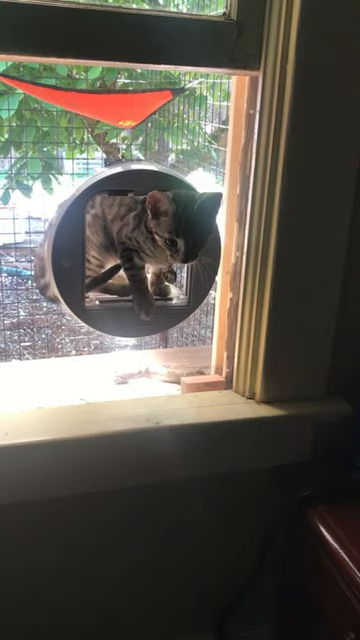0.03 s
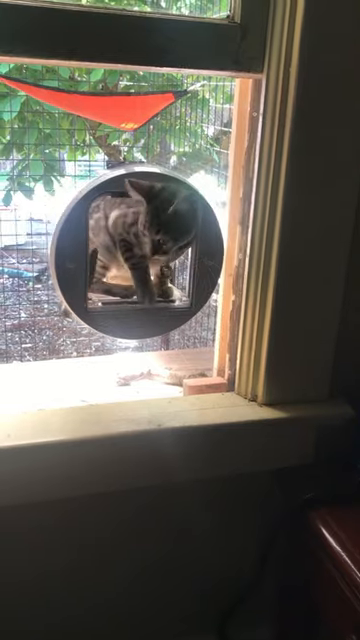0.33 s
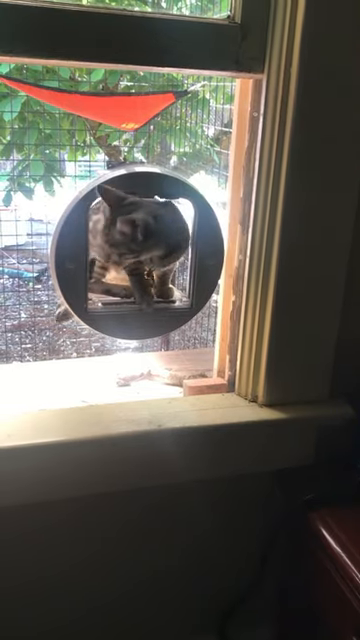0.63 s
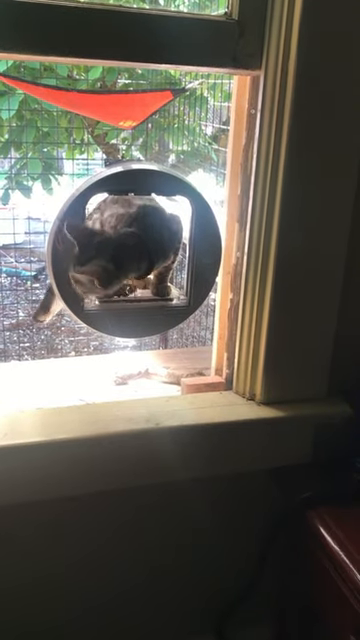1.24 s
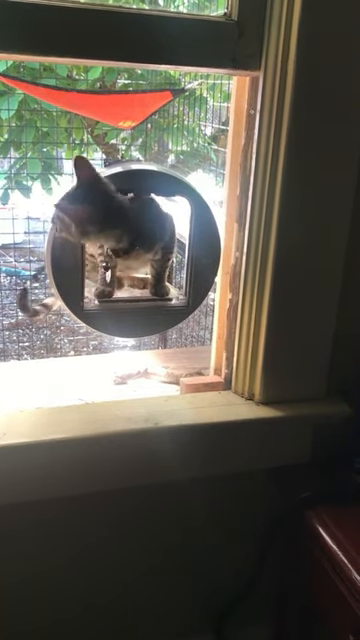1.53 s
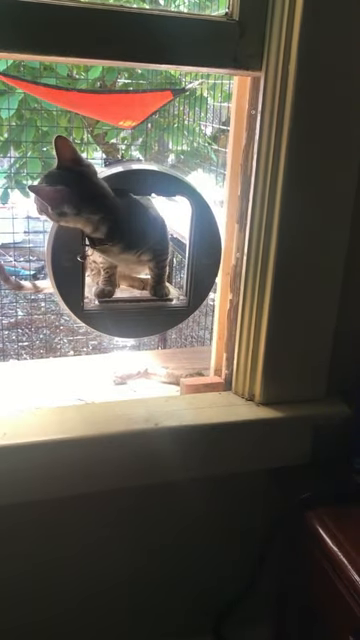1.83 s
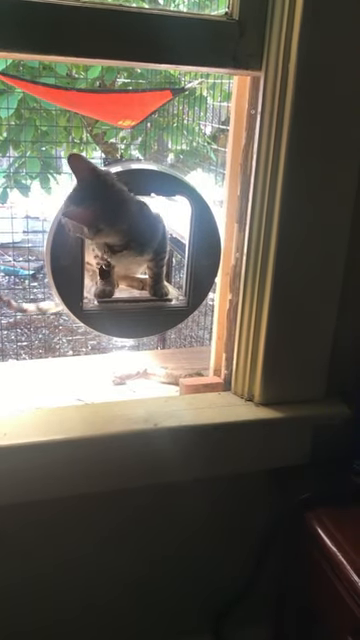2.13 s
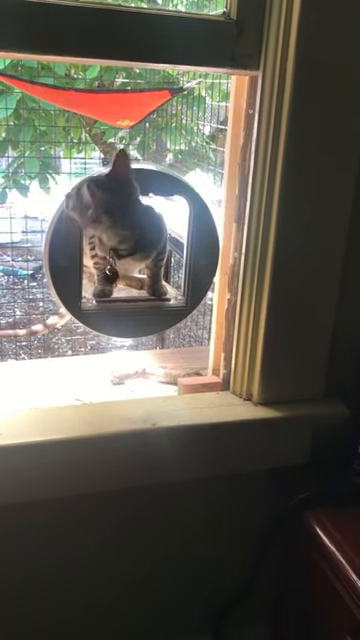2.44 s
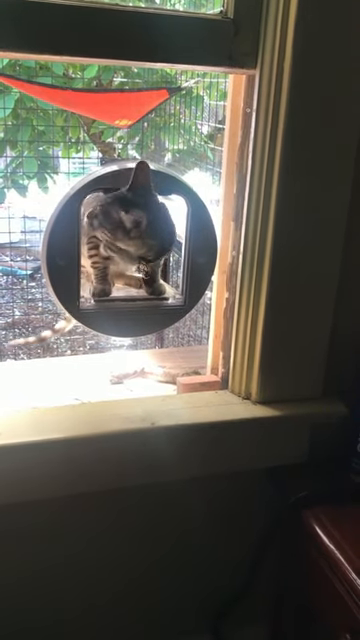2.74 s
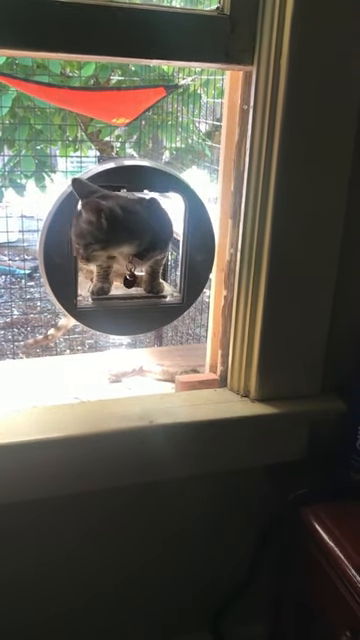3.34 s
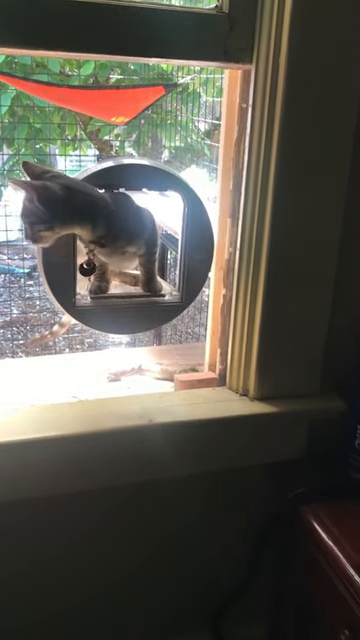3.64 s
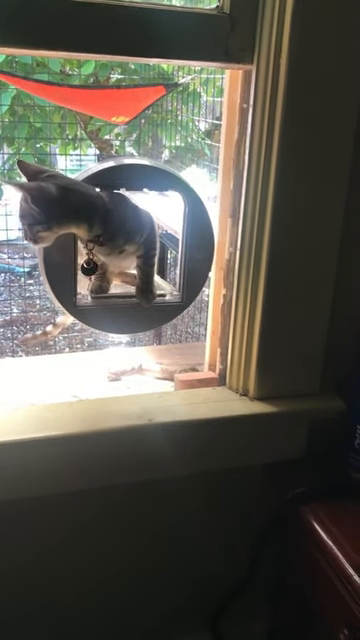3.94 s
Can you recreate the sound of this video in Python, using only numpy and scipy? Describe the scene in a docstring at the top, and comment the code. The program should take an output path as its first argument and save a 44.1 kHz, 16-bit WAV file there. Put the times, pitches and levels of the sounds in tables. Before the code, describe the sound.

In a quiet room with a low rumble, a collar bell jingles softly as a cat shifts in a cat door. The plastic flap ticks, the bell hits the frame with a sharp knock, and a few faint tinkles follow.

```python
"""A cat shifts about in a plastic cat door set in a window, heard from inside a quiet room.
Low rumble, mains hum and a faint, slowly growing wash from outdoors run throughout.
The flap ticks softly at 0.3 s. From 1 s the pellet rolls and strikes in the cat's collar bell.
At 1.8 s the flap ticks again, then the bell swings against the frame with a sharp knock.
The bell tinkles on until 2.2 s; two faint strikes follow, near 2.5 s and 3.9 s."""
import sys
import numpy as np
from scipy import signal
from scipy.fft import rfft, irfft
from scipy.io import wavfile
from scipy.ndimage import map_coordinates

SR = 44100
rng = np.random.default_rng(int(sys.argv[2]) if len(sys.argv) > 2 else 0)


def to_wav(sig):
    """Store sig (one row per channel, or 1-D mono) as 16-bit WAV at the path in sys.argv[1].

    Samples outside -1..1 are clipped; the rate is SR.
    """
    pcm = np.clip(np.atleast_2d(sig), -1, 1) * 32767
    pcm = np.round(pcm).astype(np.int16)
    wavfile.write(sys.argv[1], SR, pcm.T)  # frames by channels


N = 176400
SCENE_S = np.arange(N) / SR
EVENT_S = np.arange(SR // 2) / SR

# pellet click on the bell shell: freq_hz, level_db
CLICK_SPECTRUM = [(500, -34), (3600, -24), (4500, -3.5), (4950, -11), (5500, -3), (6400, 1.5), (7700, -15),
                  (9200, -8.5), (12500, -17), (15500, -13)]
CLICK_T60_S, RING_ATTACK_S, BELL_WET_DB = 0.029, 0.00044, -3


def amp(db):
    """Decibels to gain."""
    return 10 ** (np.asarray(db) / 20)


def along(points, hz):
    """Interpolate (freq_hz, value) points on a log frequency axis."""
    freqs_hz, values = np.transpose(points)
    return np.interp(np.log(hz + 1), np.log(freqs_hz + 1), values)


def noise(spectrum, size):
    """Coloured noise, rms 1."""
    gain = amp(along(spectrum, np.fft.rfftfreq(size, 1 / SR)))
    x = irfft(rfft(rng.standard_normal(size)) * gain, size)
    return x / np.sqrt(np.mean(x ** 2) + 1e-20)


def wobble(rate_hz):
    """Smooth random curve."""
    return map_coordinates(rng.standard_normal(1024), [SCENE_S * rate_hz], mode="mirror")


def rise(attack_s):
    """Exponential onset."""
    return 1 - np.exp(-EVENT_S / attack_s)


def fade(t60_s):
    """Exponential decay."""
    return 1000 ** (-EVENT_S / t60_s)


def mode(hz, db, t60_s):
    """Decaying sine, random phase."""
    return amp(db) * np.sin(2 * np.pi * (hz * EVENT_S + rng.random())) * fade(t60_s)


def burst(spectrum, t60_s):
    """Decaying noise: a dense cluster of short-lived resonances."""
    return noise(spectrum, len(EVENT_S)) * fade(t60_s) * rise(attack_s=0.00023)


def add(track, start_s, sound):
    """Mix a sound into the track."""
    part = track[round(start_s * SR):][:len(sound)]
    part += sound[:len(part)]


def in_room(x, wet_db=0, gap_s=0.014):
    """Add the quick reflections of the window recess and the room's tail."""
    # room decay: freq_hz, t60_s
    decay = [(300, 0.057), (1500, 0.23), (5000, 0.29), (12000, 0.09)]
    size = len(EVENT_S)
    hz, time_s, bands = signal.stft(rng.standard_normal(size), SR, nperseg=256)
    bands *= 1000 ** (-time_s / along(decay, hz)[:, None])
    tail = signal.istft(bands, SR, nperseg=256)[1][:size]
    recess = rng.standard_normal(size) * fade(t60_s=0.1)
    response = amp(-16.5) * tail / np.linalg.norm(tail) + amp(-13.5) * recess / np.linalg.norm(recess)
    wet = signal.fftconvolve(x, np.pad(response, (round(gap_s * SR), 0)))[:len(x)]
    return x + amp(wet_db) * wet


def room_tone(rumble_db=-53, waver_db=3.5, waver_rad=0.76):
    """Low rumble, thin hiss and a wavering mains hum."""
    # hum partials: freq_hz, level_db
    partials = [(53, -61), (120, -60), (240, -63)]
    # rumble and hiss spectrum: freq_hz, level_db
    rumble = [(20, -32), (35, -7), (50, -3), (58, 1.5), (72, -13), (100, -8), (145, -9.5), (185, -10),
              (280, -8), (400, -8.5), (500, -19.5), (720, -24.5), (1100, -29.5), (2000, -37.5),
              (4000, -41.5), (8000, -46.5), (15500, -48)]
    hum = np.zeros(N)
    for hz, db in partials:
        peak = np.sqrt(2) * amp(db + waver_db * wobble(5.96))
        hum += peak * np.sin(2 * np.pi * hz * SCENE_S + waver_rad * wobble(5.98))
    return hum + amp(rumble_db) * noise(rumble, N)


def outdoors(start_db=-78.5, growth_db_per_s=1.8):
    """A distant wash comes in through the open door."""
    # wash spectrum: freq_hz, level_db
    wash = [(300, -41), (600, -17.5), (1000, 2), (1500, -3), (2500, -8.5), (5000, -24.5), (10000, -41)]
    return amp(start_db + growth_db_per_s * SCENE_S) * noise(wash, N)


def flap(crack_db=-3.5):
    """The plastic flap ticks as the cat pushes by; a soft contact is duller."""
    # flap contacts: start_s, level_db, brightness_hz
    ticks = [(0.3164, -52.5, 3380), (1.814, -42.5, 8000)]
    # flap resonances: pitch_hz, level_db, t60_s
    modes = [(1093, -8, 0.038), (1374, -3.5, 0.032), (2230, -11, 0.041), (2590, -2.5, 0.024),
             (3070, -7, 0.035), (3460, -2, 0.026), (3880, 0, 0.028), (5060, -5, 0.018), (5480, 0, 0.016),
             (6170, -8, 0.019), (8870, -3, 0.02), (9600, -6, 0.012)]
    out = np.zeros(N)
    for start_s, level_db, bright_hz in ticks:
        ring = sum(mode(hz, db, t60_s) / np.hypot(1, (hz / bright_hz) ** 4) for hz, db, t60_s in modes)
        crack = amp(crack_db) * burst([(bright_hz / 2, 0), (bright_hz * 2, -18)], t60_s=0.029)
        tick = ring * rise(RING_ATTACK_S) + crack
        add(out, start_s, in_room(amp(level_db) * tick))
    return out


def pellet_roll(clicks_per_s=34, spread_db=3.5):
    """The loose pellet rattles faintly round the shell as the cat turns."""
    # pellet rolls: start_s, end_s, click_db
    rolls = [(1, 1.62, -72), (1.93, 2.18, -68)]
    out = np.zeros(N)
    for start_s, end_s, click_db in rolls:
        for click_s in rng.uniform(start_s, end_s, int((end_s - start_s) * clicks_per_s)):
            gain = amp(click_db - spread_db * rng.standard_normal())
            add(out, click_s, gain * burst(CLICK_SPECTRUM, CLICK_T60_S))
    return in_room(out, BELL_WET_DB)


def bell(scatter_hz=35, twin_offset_hz=89, twin_db=-6):
    """Each pellet strike clicks and rings the shell; the low mode beats with a weaker twin."""
    # pellet strikes: start_s, click_db, low_mode_db, middle_mode_db, top_mode_db
    strikes = [(1.027, -51.5, -53, -71, -46), (1.066, -65, -75, -78, -61), (1.0887, -65, -77, -80, -75),
               (1.1642, -56.5, -58.5, -64, -70), (1.174, -61, -76, -78, -74),
               (1.2282, -48.5, -54.5, -58, -48.5), (1.234, -55.5, -74, -66, -72),
               (1.285, -61.5, -65, -80, -78), (1.346, -60, -68, -71, -73), (1.4348, -65.5, -76, -84, -84),
               (1.5028, -62.5, -71, -72, -76), (1.5545, -72, -82, -84, -82), (1.8858, -50, -31, -55, -62),
               (1.9196, -66, -43, -62, -57), (1.9402, -55, -57, -52, -59), (1.9727, -49, -48.5, -64, -52),
               (2.01, -49.5, -56, -66, -57), (2.022, -52.5, -68, -68, -55.5),
               (2.077, -61, -55.5, -64, -57.5), (2.108, -63, -56.5, -68, -68),
               (2.1633, -69, -60.5, -70, -68), (2.171, -67, -64, -76, -76), (2.4652, -62, -59, -85, -81),
               (3.852, -63, -67, -83, -82)]
    # shell resonances, low to top: pitch_hz, t60_s
    modes = [(4520, 0.042), (10590, 0.065), (11120, 0.055)]
    out = np.zeros(N)
    for start_s, click_db, *modes_db in strikes:
        ring = np.zeros(len(EVENT_S))
        for k, ((hz, t60_s), db) in enumerate(zip(modes, modes_db)):
            hz = hz + rng.uniform(-scatter_hz, scatter_hz)
            wave = np.sin(2 * np.pi * hz * EVENT_S)
            if k == 0:
                wave += amp(twin_db) * np.sin(2 * np.pi * (hz + twin_offset_hz) * EVENT_S)
            ring += amp(db) * wave * fade(t60_s)
        click = amp(click_db) * burst(CLICK_SPECTRUM, CLICK_T60_S)
        add(out, start_s, in_room(ring * rise(RING_ATTACK_S) + click, BELL_WET_DB))
    return out


def frame_knock(crack_t60_s=0.019, thud_t60_s=0.044):
    """The bell hits the frame and rings it, rebounds twice and sings as it comes free."""
    # bell hits on the frame: start_s, level_db, thud_db, fizz_db
    hits = [(1.8858, -24.5, -40.5, -49), (1.898, -29.5, -39, -50), (1.9033, -27, -39.5, -43)]
    # frame resonances: pitch_hz, level_db, t60_s
    modes = [(542, -1.5, 0.076), (1135, 1.5, 0.077), (1283, -3, 0.11), (2194, 2, 0.067), (2530, 0, 0.1),
             (3060, -1, 0.069), (3490, 3, .045), (3840, 5, 0.048), (4500, 7, .035), (5090, 1, 0.038),
             (5200, 0, 0.038), (6360, 4, 0.069)]
    # sharp contact: freq_hz, level_db
    crack_spectrum = [(300, -27), (1700, -24), (2300, -7.5), (3300, -4), (4500, 0), (5350, 2.5), (5700, -8),
                      (6300, -2.5), (7800, -18), (8700, -11), (10000, -23), (16000, -34)]
    # low body of the hit: freq_hz, level_db
    thud_spectrum = [(150, -32), (480, -6), (760, -11.5), (1050, -1), (1300, -4), (1650, -10), (3000, -14)]
    # top treble of the hit: freq_hz, level_db
    fizz_spectrum = [(6000, -36), (11000, -12), (14500, 9), (16000, 4)]
    out = np.zeros(N)
    for start_s, level_db, thud_db, fizz_db in hits:
        frame = amp(-25) * sum(mode(hz, db, t60_s) for hz, db, t60_s in modes)
        crack = burst(crack_spectrum, crack_t60_s)
        thud = amp(thud_db) * burst(thud_spectrum, thud_t60_s)
        fizz = amp(fizz_db) * burst(fizz_spectrum, crack_t60_s)
        hit = amp(level_db) * (crack + frame) + thud + fizz
        add(out, start_s, in_room(hit, wet_db=-2))
    sing = mode(hz=11110, db=-15, t60_s=0.058) * rise(attack_s=0.014) ** 2
    add(out, start_s=1.901, sound=in_room(sing, wet_db=2.5))
    return out


def scene():
    """All sources, mono."""
    return (room_tone() + outdoors() + bell() + frame_knock() + flap() + pellet_roll())[None]


def record(dry):
    """Brief opening silence, then a brick-wall low-pass."""
    start_s, cutoff_hz = 0.036, 15900
    gated = dry * (SCENE_S >= start_s)
    return irfft(rfft(gated) * (np.fft.rfftfreq(N, 1 / SR) < cutoff_hz), N)


dry = scene()
out = record(dry)
to_wav(out)
```